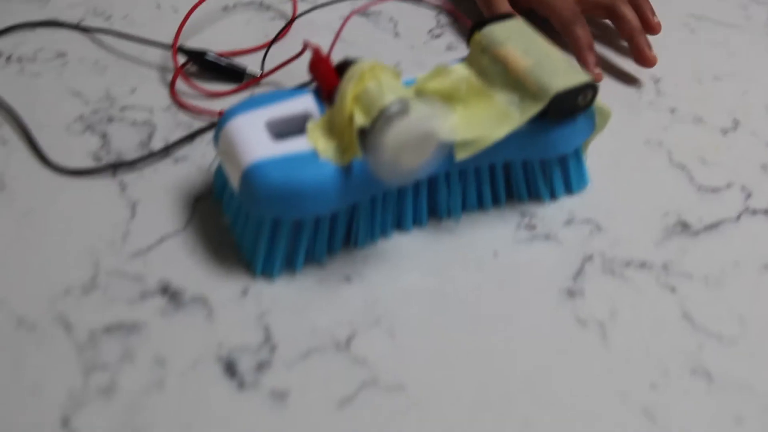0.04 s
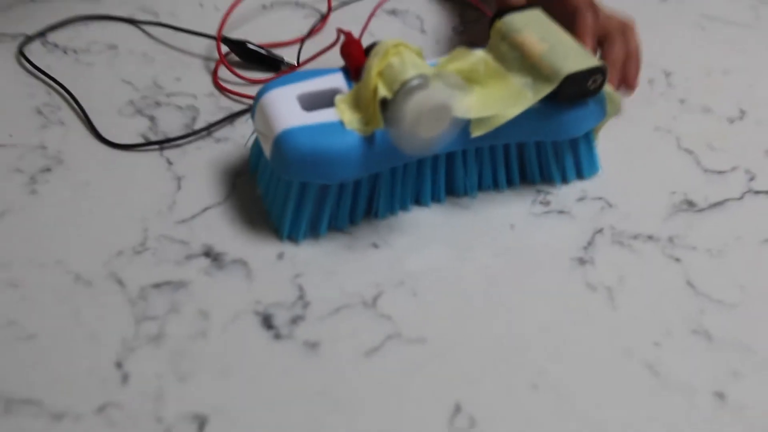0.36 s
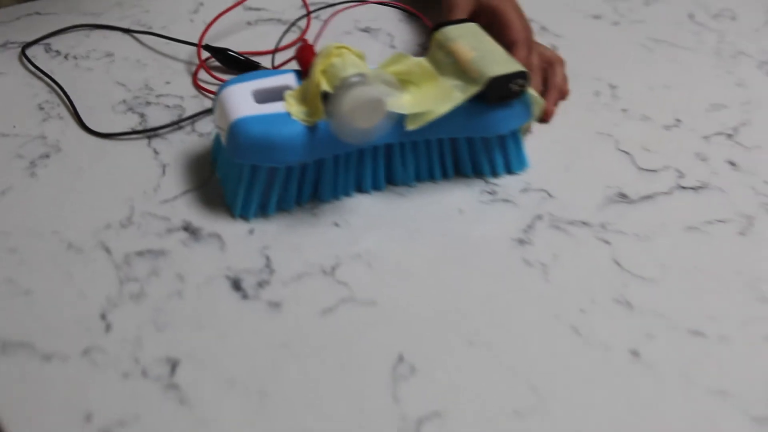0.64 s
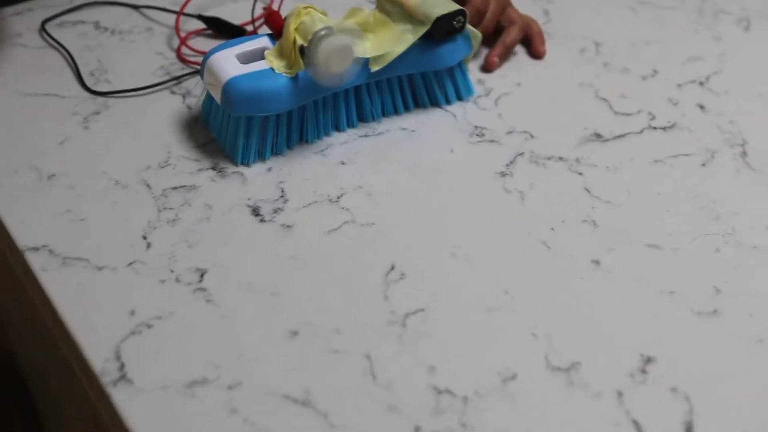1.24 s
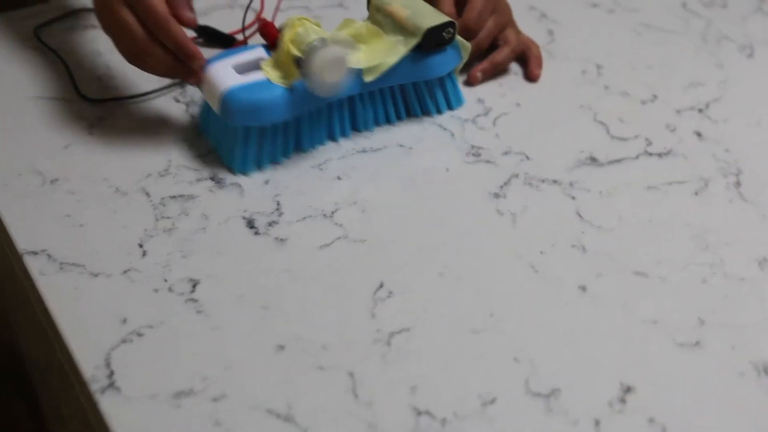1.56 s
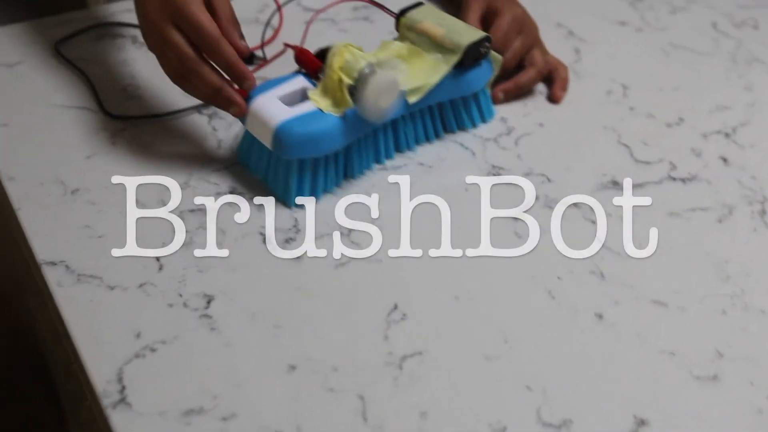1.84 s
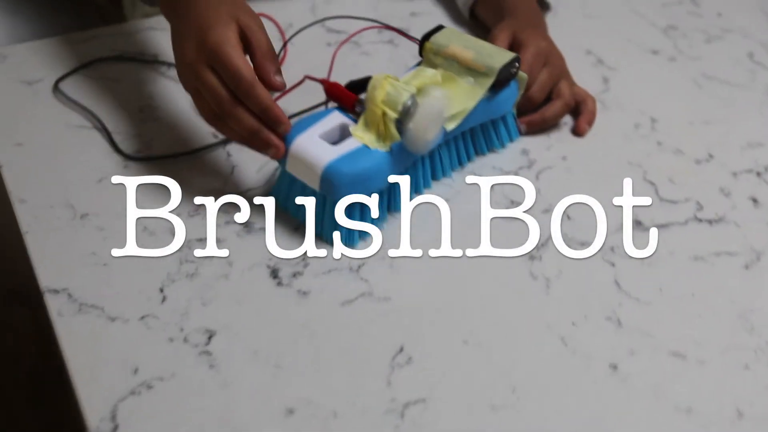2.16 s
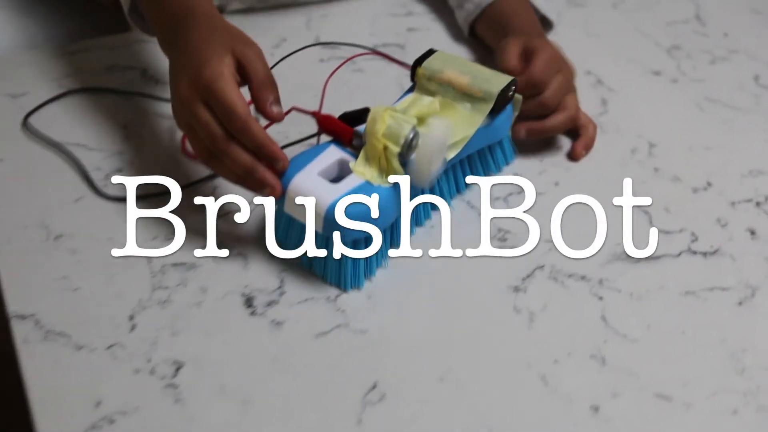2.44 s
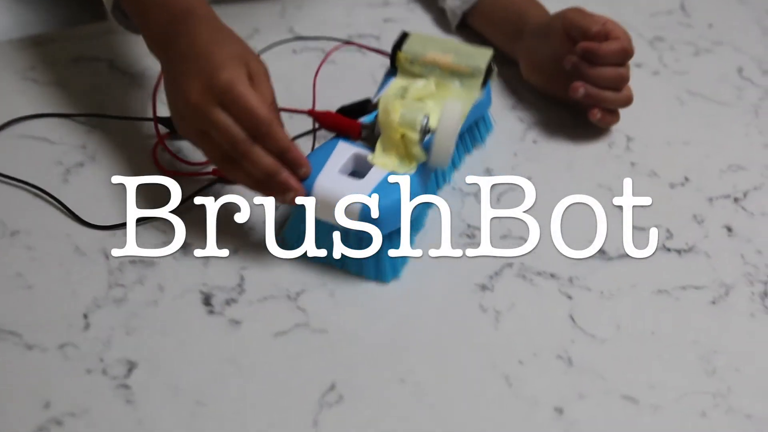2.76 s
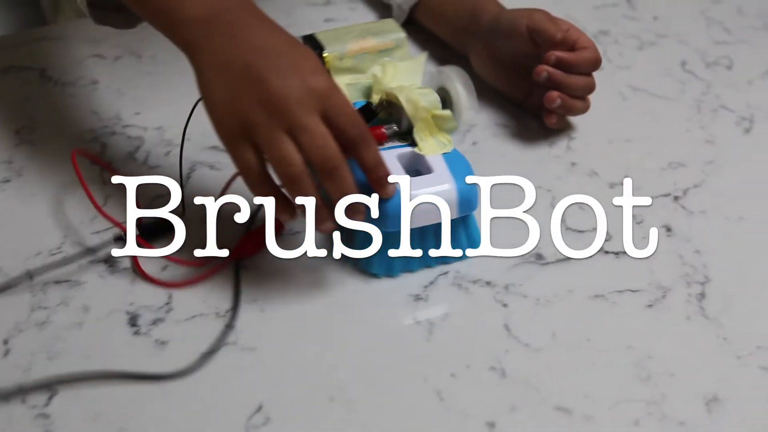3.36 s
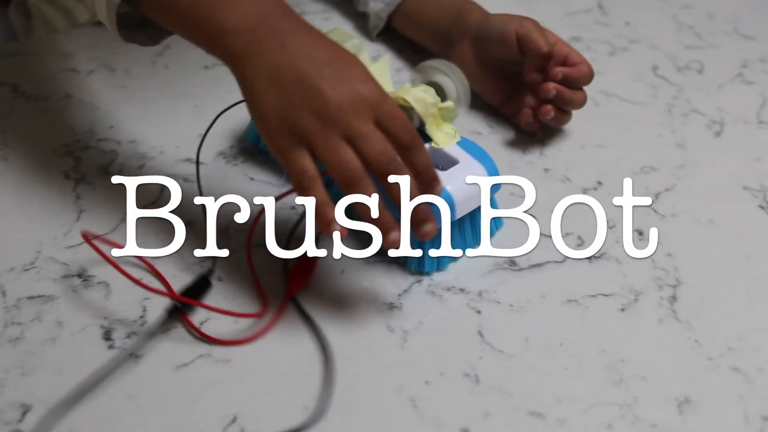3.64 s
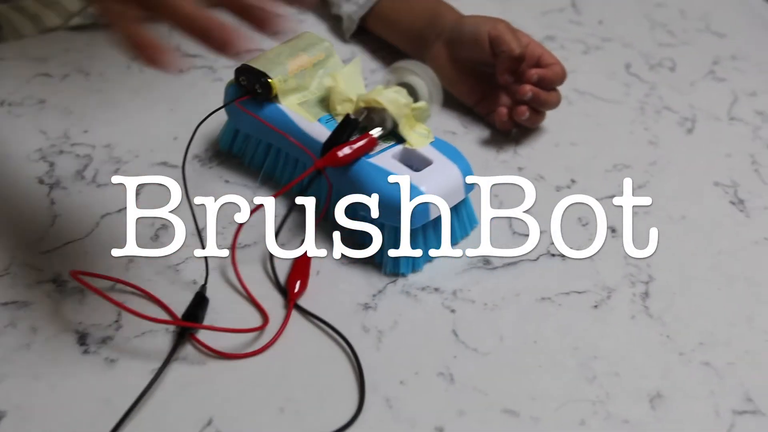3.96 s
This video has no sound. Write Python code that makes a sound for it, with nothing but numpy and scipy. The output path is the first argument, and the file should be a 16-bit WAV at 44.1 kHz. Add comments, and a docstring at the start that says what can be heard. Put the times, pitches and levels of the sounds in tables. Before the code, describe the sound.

A motorised scrubbing brush buzzes and rattles on a stone tabletop throughout, close by indoors, with loose parts chattering over a low hum. Soft, dull bumps sound at about 0.3 and 0.9 seconds. The pitch slowly sags as a hand turns the brush, and the level dips for an instant near 2.25 seconds. From about 2.7 seconds the pressed brush sounds louder and more nasal, easing slightly by 4 seconds.

```python
"""A hard, rattling buzz: a motorised scrubbing brush shaking on a stone tabletop, indoors.
The motor's off-centre weight knocks the plastic body once a turn; loose parts chatter and the
commutator ticks between knocks, over a low hum from the table. Two soft bumps sound early on.
The motor slowly sags as a hand turns the brush and presses on it, shifting its tone.
Just past halfway the level dips briefly."""
import sys
import numpy as np
from scipy import signal
from scipy.io import wavfile

SR = 44100
rng = np.random.default_rng(int(sys.argv[2]) if len(sys.argv) > 2 else 0)


def unload_audio(sound):
    """Save the sound as a 16-bit wav file, at the path given as the first command line argument."""
    columns = np.transpose(np.atleast_2d(sound))
    # keep every value between -1 and 1, then stretch to whole-number steps
    steps = np.round(np.clip(columns, -1, 1) * 32767)
    wavfile.write(sys.argv[1], SR, steps.astype(np.int16))


N = 176400
TIME = np.arange(N) / SR


def amp(db):
    """Decibels to gain."""
    return 10 ** (np.asarray(db) / 20)


def unit(x):
    """Scales to rms 1."""
    return x / np.sqrt(np.mean(x ** 2) + 1e-20)


def curve(rows, t=TIME, column=1):
    """Reads one column of a time table as an envelope."""
    rows = np.array(rows)
    return np.interp(t, rows[:, 0], rows[:, column])


def at_hz(rows, hz):
    """Reads a table on a log-frequency axis."""
    points, values = np.transpose(rows)
    return np.interp(np.log(hz + 1), np.log(points + 1), values)


def eq(x, rows, size=4096):
    """Minimum-phase EQ with the given curve."""
    hz = abs(np.fft.fftfreq(size, 1 / SR))
    log_gain = np.log(amp(at_hz(rows, hz)))
    taps = np.fft.ifft(np.exp(np.conj(signal.hilbert(log_gain)))).real
    return signal.oaconvolve(x, taps[:size // 2])[:N]


def highpass(x, hz):
    """Zero-phase low cut."""
    return signal.filtfilt(*signal.butter(2, hz, "high", fs=SR), x)


def band(x, hz, width_hz):
    """Two band-pass stages, each width_hz wide."""
    b, a = signal.iirpeak(hz, hz / width_hz, SR)
    return signal.lfilter(b, a, signal.lfilter(b, a, x))


def glide(x, hz, width_hz):
    """A resonance of gain 1 that follows the curve hz."""
    spin = np.exp(2j * np.pi * np.cumsum(hz) / SR)
    pole = np.exp(-np.pi * width_hz / SR)
    return 2 * (spin * signal.lfilter([1 - pole], [1, -pole], x / spin + 1e-18)).real


def clicks(times, gains, size=16):
    """Band-limited impulses at exact times."""
    at = times[:, None] * SR
    taps = np.floor(at).astype(int) + np.arange(1 - size, size + 1)
    shape = np.sinc(taps - at) * np.cos(np.pi / 2 * (taps - at) / size) ** 2
    return np.bincount(taps.ravel() % (2 * N), (gains[:, None] * shape).ravel(), 2 * N)[:N]


# The sagging motor. Each row: time in seconds, turns per second.
SPEED = [(0.0, 94.41), (0.3, 94.19), (0.65, 94.26), (0.85, 93.66), (1.0, 93.15), (1.15, 92.67),
         (1.4, 91.85), (1.55, 91.74), (1.7, 91.02), (1.9, 91.14), (2.1, 89.76), (2.35, 90.08),
         (2.53, 89.23), (2.7, 89.42), (2.85, 89.15), (3.05, 87.7), (3.2, 86.66), (3.32, 86.92),
         (3.5, 85.76), (3.62, 85.51), (3.72, 85.21), (3.85, 86.52), (4.0, 87.75)]


def shaft(drift_ms=.1, first_knock_turn=.87):
    """Shaft angle in turns, wandering a little; knocks fall on whole numbers."""
    speed = curve(SPEED)
    drift_s = drift_ms / 1000 * signal.resample(rng.standard_normal(60), N)
    return np.cumsum(speed) / SR - first_knock_turn + drift_s * speed


# Looseness of the rhythm. Each row: time in seconds, timing scatter in ms.
SCATTER = [(0, .19), (.6, .19), (.75, .11), (1.1, .1), (1.5, .06), (1.62, .16), (1.88, .16), (2.05, .05),
           (2.8, .025), (3.6, .025), (4, .05)]
# Two stumbles, each a weak hit and then a stronger one. Each row: time in seconds, trim in dB.
STUMBLES = [(.635, -3), (.645, -1), (1.857, -1.5), (1.868, 3)]


def strikes(turns, place, count=380, rocks_per_turn=.3262, swing_kept=.742, db_per_ms=6):
    """One impulse a turn; as the brush rocks, it lands early and hard or late and soft."""
    rocking = [1, -2 * swing_kept * np.cos(2 * np.pi * rocks_per_turn), swing_kept ** 2]
    swing = unit(signal.lfilter([1], rocking, rng.standard_normal(count)))
    times = np.interp(np.arange(count) + place, turns, TIME, right=1.5 * N / SR)
    late_ms = curve(SCATTER, times) * swing
    half_turn_s = .5 / SPEED[0][1]
    stumble_db = sum(db * (abs(times - when) < half_turn_s) for when, db in STUMBLES)
    return clicks(times + late_ms / 1000, amp(stumble_db - db_per_ms * late_ms))


# Tone of the contact, then of the body when free, turned and pressed.
# Each row: frequency in Hz, relative gain in dB.
CONTACT_EQ = [(4000, -1), (6000, 1.5), (9000, -4), (15500, 2.5)]
FREE_EQ = [(60, -72), (200, -31.5), (480, -21), (650, -16), (820, -10), (1020, -0.5), (1450, 2.5),
           (1720, -4.5), (2200, 1.3), (2500, -15), (2800, -4), (3120, -22), (3900, -2.5), (4450, -10.5),
           (5000, -27.5), (6100, -26), (7000, -29), (11000, -30), (15500, -59)]
TURNED_EQ = [(60, -50), (250, -33), (450, -20), (620, -17.5), (820, -8.5), (1060, -.5), (1400, -1.5),
             (1750, -2), (2100, -4), (2500, -5.5), (2950, -16), (3420, -5), (4000, -9), (4650, -25),
             (5200, -23), (7000, -31), (9000, -38), (11000, -28), (15500, -40)]
PRESSED_EQ = [(60, -44), (200, -18.5), (350, -20), (520, -42), (680, -12.5), (830, -14), (1100, 6),
              (1350, 2.5), (1550, 2), (1950, -12.5), (2300, 0.5), (2800, -12), (3300, -15), (3800, -14),
              (4200, -16), (4600, -17.5), (5200, -35), (5900, -23), (7700, -24), (15500, -59)]
# A lighter, brighter second hit under the hand. Each row: time in seconds, delay in ms.
REBOUND = [(2.5, 1.6), (2.95, 1.52), (3.2, 1.39), (3.6, 1.28), (4, 1.3)]
# Modes that ring under the hand. Each row: pitch in Hz, T60 in seconds, relative level in dB.
MODES = [(1210, 0.012, -17.5), (2177, 0.033, -10)]


def knocks(blows, grip, trim_db=1, rebound_db=-5.5, damping=.81):
    """The plastic body answers each blow; grip shifts its tone and brings out a rebound and two modes."""
    press = np.clip(grip - 1, 0, 1)
    rebound = np.interp(TIME - curve(REBOUND) / 1000, TIME, highpass(blows, hz=1990))
    push = eq(blows + press * amp(rebound_db) * rebound, CONTACT_EQ)
    body = 0
    for stage, tone in enumerate([FREE_EQ, TURNED_EQ, PRESSED_EQ]):
        crossfade = np.maximum(1 - abs(grip - stage), 0)
        body += crossfade * unit(eq(push, tone))
    t = TIME[:SR // 10]
    for hz, t60, db in MODES:
        ring = amp(-60 * t / t60) * np.cos(2 * np.pi * hz * t)
        body += press * amp(db) * unit(signal.oaconvolve(blows, ring)[:N])
    return -amp(trim_db) * body / (1 + press * damping)


def puffs(turns, place, width):
    """A puff of noise at one place in every turn."""
    distance = (turns - place + .5) % 1 - .5
    return np.exp(-.5 * (distance / width) ** 2) * rng.standard_normal(N)


def rattle(turns, place, width, noise_share):
    """One contact a turn: part clean tap, part puff of noise."""
    taps = unit(strikes(turns, place))
    noise = unit(puffs(turns, place, width))
    return np.sqrt(1 - noise_share) * taps + np.sqrt(noise_share) * noise


# Loose contacts. Each row: place and width in turns, relative level in dB when free and when pressed.
CHATTER = [(0.081, 0.05, -19, -16.5), (0.292, 0.19, -14.5, -19.5), (0.702, 0.35, -10.5, -24)]
# Their tone. Each row: frequency in Hz, relative gain in dB.
CHATTER_EQ = [(200, -34), (700, -12.5), (1200, -12), (2200, 5), (2650, -0.5), (3050, -2.5), (3600, -5),
              (4300, -13.5), (5500, -15.5), (15000, -41.5)]
# How freely they move. Each row: time in seconds, boost in dB.
PLAY = [(0, 1.5), (1.7, 5), (1.9, 8), (2.45, 7), (2.7, 5), (3.3, 4), (3.7, 6), (4, 7.5)]


def chatter(turns, grip):
    """Loose parts rebound between the knocks, more evenly under the hand."""
    noise_share = np.interp(grip, [0, 2], [.4, .12])
    out = 0
    for place, width, free_db, pressed_db in CHATTER:
        contact = eq(rattle(turns, place, width, noise_share), CHATTER_EQ)
        out += amp(np.interp(grip, [0, 2], [free_db, pressed_db])) * unit(contact)
    return amp(curve(PLAY)) * out


# Fader for the scrape. Each row: time in seconds, level in dB.
SCRAPE_LEVEL = [(0, -38), (.7, -41.5), (1.55, -47.5), (1.61, -39), (1.69, -52), (1.84, -45), (1.87, -44),
                (1.91, -45), (2.1, -41.5), (2.7, -41.5), (3.15, -35.5), (3.6, -42.5), (3.8, -49), (4, -42)]
# Its tone. Each row: frequency in Hz, relative gain in dB.
SCRAPE_EQ = [(500, -9), (3000, 4), (6000, -1), (10000, -2), (13000, -3.5), (15500, -2)]


def scrape(turns):
    """A short hiss of contact follows each blow."""
    hiss = eq(puffs(turns, place=.13, width=.11), SCRAPE_EQ)
    return amp(curve(SCRAPE_LEVEL)) * unit(hiss)


# Top-end fizz. Each row: place and width in turns, centre and filter width in Hz,
# level in dB when free and when pressed.
TICKS = [(.33, 0.054, 11010, 1700, -48, -56), (.77, 0.084, 7400, 2300, -51, -45),
         (0.6, 0.054, 8600, 8500, -47.5, -65), (0.8, .05, 12800, 1600, -68, -38)]


def commutator(turns, grip):
    """Bright ticks in every turn; pressing the brush shifts their balance."""
    press = np.clip(grip - 1, 0, 1) ** 2
    out = 0
    for place, width, hz, width_hz, free_db, pressed_db in TICKS:
        ticks = band(rattle(turns, place, width, noise_share=.65), hz, width_hz)
        out += amp(free_db + (pressed_db - free_db) * press) * unit(ticks)
    return out


# Two hollow tones that glide as the brush turns, and a nasal one that swells under the hand.
# Each row: time in seconds, centre in Hz, level in dB.
LOW_HOLLOW = [(0, 3700, -35), (.3, 3840, -37), (1.1, 3680, -44), (1.6, 3520, -51), (2.1, 3720, -43),
              (2.9, 3660, -31.5), (3.3, 3800, -42), (3.45, 3750, -48), (3.6, 3300, -28.5), (4, 3580, -44)]
HIGH_HOLLOW = [(0, 5800, -66), (1.1, 6100, -50), (1.9, 5870, -62), (2.5, 5200, -73), (2.9, 4550, -51),
               (3.2, 4820, -52), (3.45, 5150, -50), (3.65, 5240, -53), (3.8, 5400, -70)]
NASAL = [(0, 1700, -60), (2.2, 1700, -46), (2.55, 1700, -32), (3.0, 1700, -25), (3.5, 1680, -26),
         (3.75, 1620, -32), (4, 1600, -36)]


def body_resonances(blows):
    """The blows ring three gliding resonances, the nasal one in opposite polarity."""
    out = 0
    for rows, width_hz, polarity in [(LOW_HOLLOW, 620, 1), (HIGH_HOLLOW, 520, 1), (NASAL, 460, -1)]:
        hz = curve(rows)
        ring = glide(glide(blows, hz, width_hz), hz, width_hz)
        out += polarity * amp(curve(rows, column=2)) * unit(ring)
    return out


# The low end. Each row: time in seconds, levels in dB of shaft harmonics 1, 2 and 3.
HUM = [(0, -44, -53, -64), (.7, -45.5, -51.5, -87), (1.4, -50, -51.5, -86), (2.45, -49.5, -54.5, -73),
       (3, -59.5, -50, -63), (3.55, -52, -42.5, -44.5), (3.8, -58, -52.5, -57), (4, -78, -56, -59)]
# Its overtones. Each row: harmonic number, level in dB when free and when pressed.
OVERTONES = [(5, -47, -60), (6, -52, -62)]


def table_hum(turns, grip):
    """The shaken table carries clean low harmonics of the shaft."""
    levels = [(k, curve(HUM, column=k)) for k in (1, 2, 3)]
    levels += [(k, np.interp(grip, [0, 2], [free, pressed])) for k, free, pressed in OVERTONES]
    return sum(np.sqrt(2) * amp(db) * np.sin(2 * np.pi * (k * turns + rng.random())) for k, db in levels)


# The background's tone. Each row: frequency in Hz, relative gain in dB.
ROOM_TONE_EQ = [(15, -18), (38, -5), (60, -6.5), (150, -7), (400, -3.5), (1000, -4), (16000, -44)]


def room_tone(level_db=-47.5):
    """A faint, steady bed of dark noise."""
    return amp(level_db) * unit(eq(rng.standard_normal(N), ROOM_TONE_EQ))


# Reverb length. Each row: frequency in Hz, T60 in seconds.
ROOM_T60 = [(100, 0.91), (1000, 0.6), (4000, 0.71), (16000, 0.54)]


def reverb(x, predelay_s=.003, spacing=22):
    """Sparse room reflections, each band dying at its own speed."""
    count = SR // 2 // spacing
    arrivals = int(predelay_s * SR) + np.arange(count) * spacing + rng.integers(0, spacing, count)
    echoes = np.zeros(SR)
    echoes[arrivals] = rng.choice([-1., 1.], count)
    hz, t, spectrum = signal.stft(echoes, SR, nperseg=256)
    decay = amp(-60 * t / at_hz(ROOM_T60, hz)[:, None])
    tail = signal.istft(spectrum * decay, SR)[1]
    return signal.fftconvolve(x, tail / np.linalg.norm(tail))[:N]


# A scoop in the upper mids. Each row: time in seconds, centre in Hz, depth from 0 to 1.
NOTCH = [(0, 2530, 0), (.7, 2730, 0.12), (1.5, 2640, 0.33), (2.15, 2870, 0.6), (2.65, 3070, 0.4),
         (2.9, 3080, 0), (3.5, 3960, 0.5), (3.75, 4060, 0.2), (4, 4230, 0.4)]


def sliding_notch(buzz, width_hz=350):
    """A gap in the tone of the buzz slides upward."""
    return buzz - curve(NOTCH, column=2) * glide(buzz, curve(NOTCH), width_hz)


# Two bumps, the first a double hit.
# Each row: start in seconds, dry peak level in dB, centre and filter width in Hz.
BUMPS = [(.317, -20.5, 284, 334), (.337, -26.5, 171, 101), (0.904, -22.5, 239, 89)]


def bumps(reverb_db=-2.5):
    """Short dull knocks on the table, echoed by the room."""
    out = 0
    for start, db, hz, width_hz in BUMPS:
        thud = band(clicks(np.array([start]), np.ones(1)), hz, width_hz)
        out += amp(db) * thud / abs(thud).max()
    return out + amp(reverb_db) * reverb(out)


# The hand. Each row: time in seconds, grip (0 free, 1 being turned, 2 pressed).
GRIP = [(0, 0.066), (.95, 0.18), (1.55, 0.68), (2.45, 0.9), (2.95, 1.45), (3.5, 1.84), (4, 1.76)]
# Force behind the knocks and chatter. Each row: time in seconds, gain in dB.
FORCE = [(0, -20.5), (.3, -21.5), (1.05, -21.5), (1.55, -22), (1.61, -20), (1.72, -22.5), (1.92, -23.5),
         (2.03, -20.5), (2.18, -23.5), (2.45, -21.5), (2.76, -18.5), (2.95, -17), (3.5, -15), (3.7, -17),
         (4, -19.5)]


def scene(reverb_db=-10):
    """The mono mix: buzz and hum follow the shaft, joined by the bumps and room tone."""
    turns, grip = shaft(), curve(GRIP)
    blows = strikes(turns, place=0)
    buzz = amp(curve(FORCE)) * (knocks(blows, grip) + chatter(turns, grip))
    buzz += scrape(turns) + commutator(turns, grip) + body_resonances(blows)
    buzz += amp(reverb_db) * reverb(buzz)
    return (sliding_notch(buzz) + room_tone() + table_hum(turns, grip) + bumps())[None]


# A split-second dip in level. Each row: time in seconds, linear gain.
DIP = [(2.238, 1), (2.251, .05), (2.254, .05), (2.265, 1)]


def record(dry, ceiling=.44, knee=6, top_hz=15850):
    """The peaks are softly clipped without adding bass, the level dips once, and the top is cut off."""
    clipped = dry / (1 + abs(dry / ceiling) ** knee) ** (1 / knee)
    tamed = dry - highpass(dry - clipped, hz=550)
    high_cut = signal.firwin(511, top_hz, window=("kaiser", 9), fs=SR)
    return signal.oaconvolve(tamed * curve(DIP), high_cut[None], "same")


dry = scene()
out = record(dry)
unload_audio(out)
```